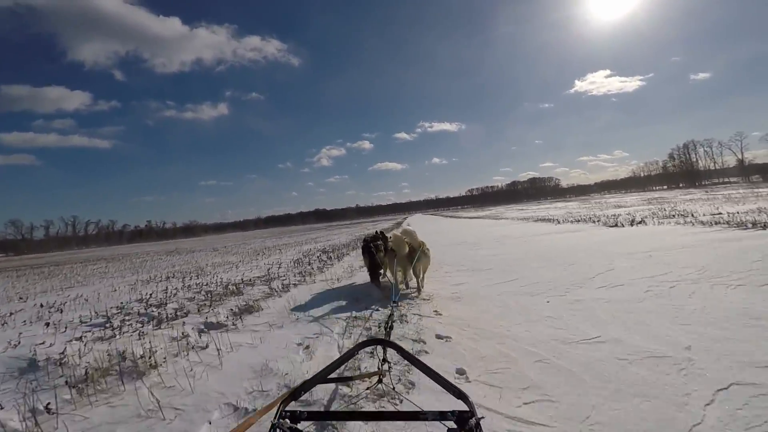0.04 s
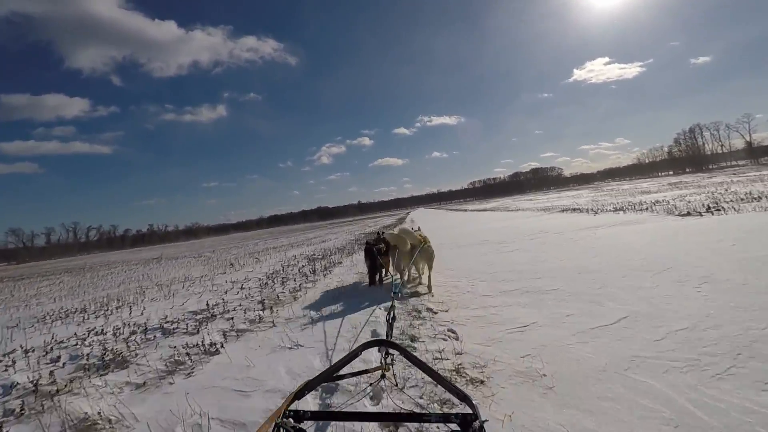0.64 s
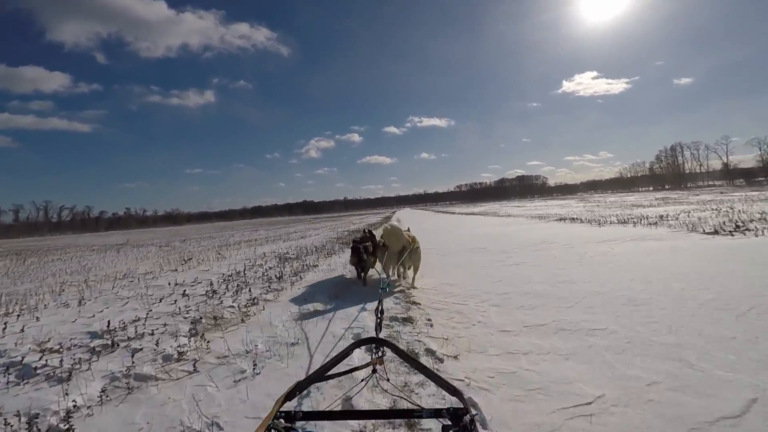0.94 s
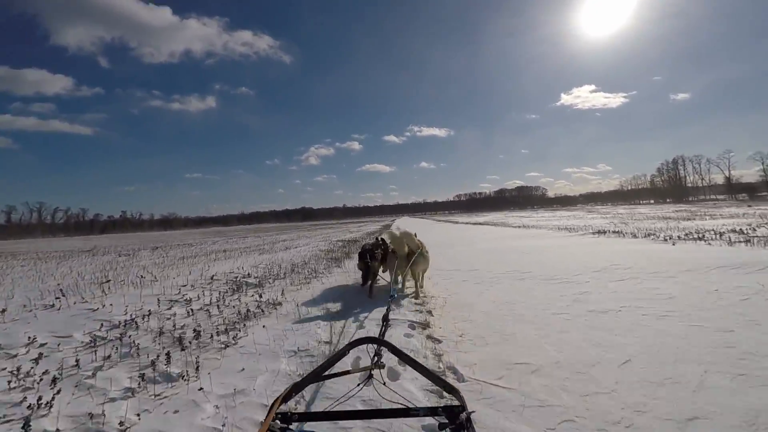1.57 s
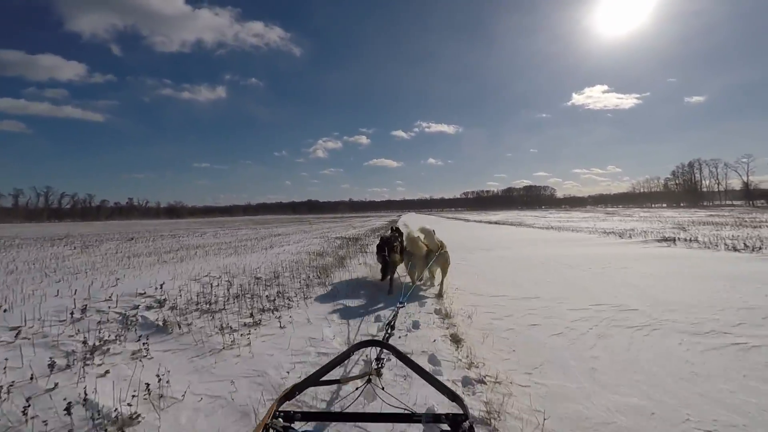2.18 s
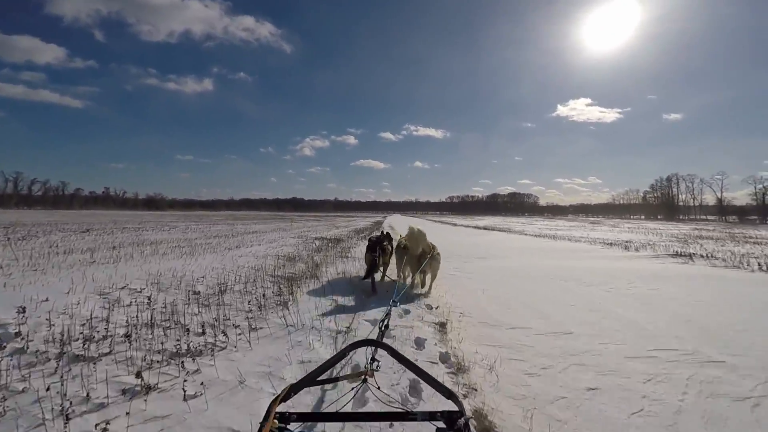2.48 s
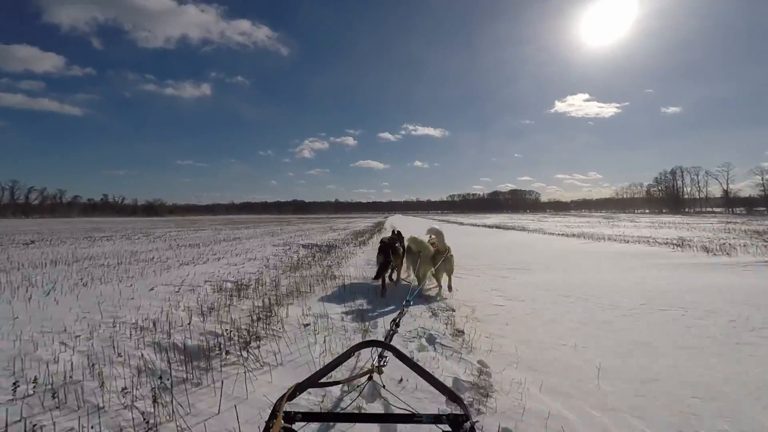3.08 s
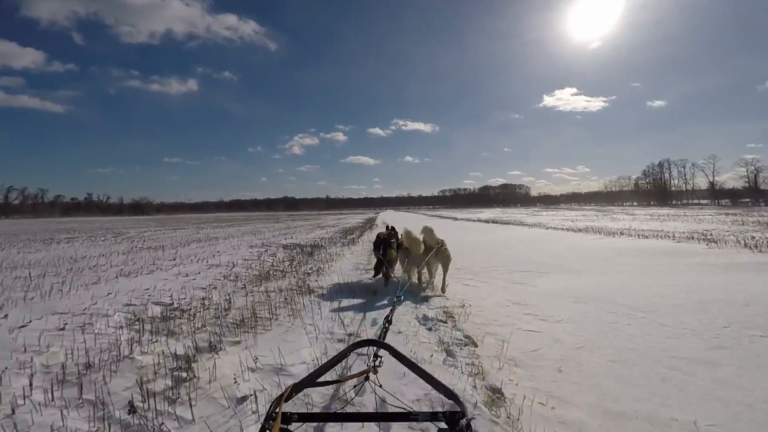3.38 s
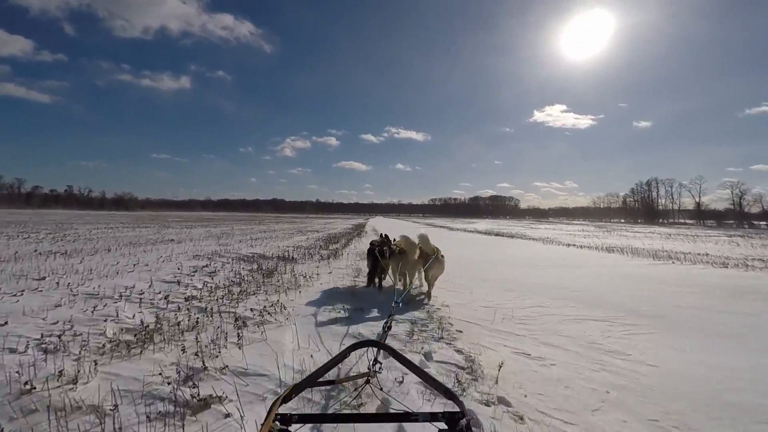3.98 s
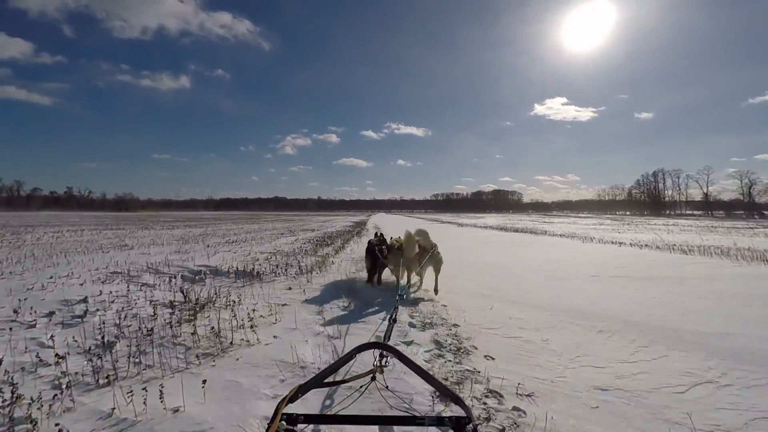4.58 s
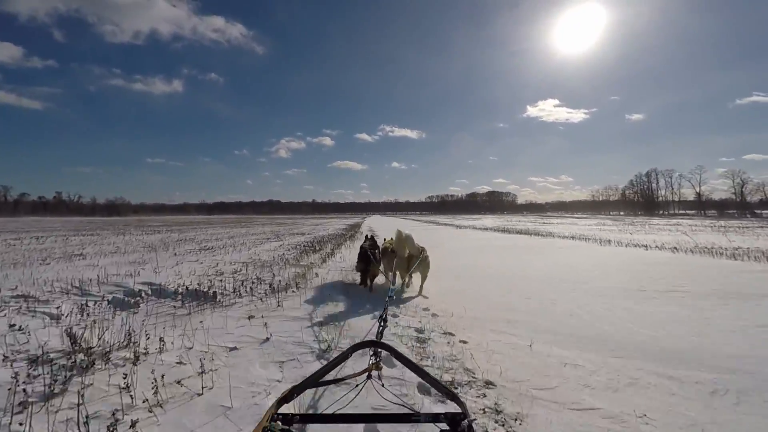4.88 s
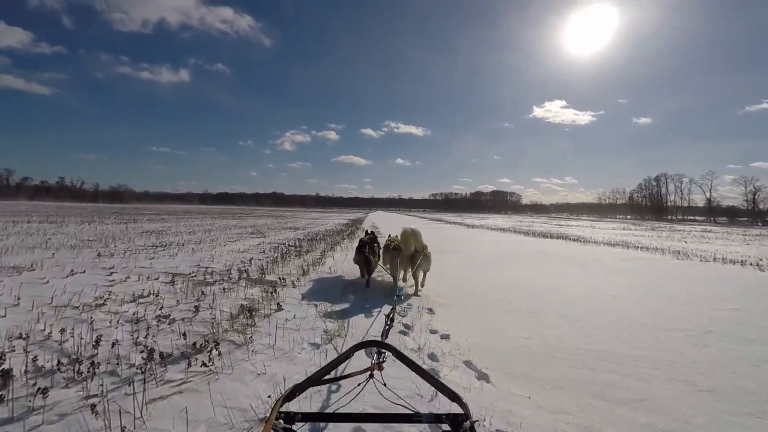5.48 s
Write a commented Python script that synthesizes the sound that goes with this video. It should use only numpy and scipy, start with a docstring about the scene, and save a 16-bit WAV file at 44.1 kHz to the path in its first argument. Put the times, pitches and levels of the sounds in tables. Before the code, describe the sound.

Wind buffets a microphone mounted on a dog sled throughout, a low, fluttering rumble with sudden slaps, in open air without echo. Beneath it the runners hiss and grind over crusty snow, with a faint hollow hum from the microphone's case. The runners squeak faintly during the first 0.7 seconds, and a slap and deep thud land at about 0.65. Sharp knocks and a short scrape cluster at 1.5 seconds, followed by a thud and a crack around 2. The wind eases from about 2.1 to 4 seconds while the snow hiss grows. The busiest clatter comes from 3.5 to 3.8 seconds: knocks, scrapes, dull thuds, bright tow line clinks and dry ice ticks. The wind surges back with another thud near 4.2 seconds and keeps gusting over lighter scattered knocks until the end at about 5.7.

```python
"""Wind eddies buffet and slap a cased camera fixed to a dog sled running over a snowy field.
Ridges thud; crust and stubble knock and scrape on the frame, ringing its modes and the case's.
The runners crush snow grains, which grind and hiss, and sing by stick-slip on hard snow.
The tow line's hardware clinks, thrown ice specks tick, and runners and wind keep the case humming."""
import sys
import numpy as np
from scipy import signal
from scipy.fft import rfft, irfft, next_fast_len
from scipy.io import wavfile
from scipy.ndimage import uniform_filter1d, map_coordinates

SR = 44100
rng = np.random.default_rng(int(sys.argv[2]) if len(sys.argv) > 2 else 0)


def log_audio(samples):
    """Write samples as a 16-bit WAV file to the path given in sys.argv[1]."""
    # one column per channel
    frames = np.atleast_2d(samples).T
    # limit to full scale, then quantise
    limited = np.clip(frames, -1, 1)
    pcm = np.round(limited * 32767).astype(np.int16)
    wavfile.write(sys.argv[1], SR, pcm)


N = 253134

# Wind over the case. Each row: time in seconds, strength in dB.
WIND_STRENGTH = [(0, -24.5), (.13, -23.5), (.47, -20), (.85, -21.5), (1.25, -19), (1.5, -25.5), (1.85, -23),
                 (2.07, -22), (2.14, -29), (2.6, -29.5), (2.95, -28), (3.06, -27.5), (3.28, -26.5),
                 (3.9, -27), (4.15, -20), (4.42, -24), (4.72, -23.5), (5.25, -21), (5.74, -24.5)]
# Lulls between eddies. Each row: start in seconds, length in seconds, depth in dB.
LULLS = [(0.348, 0.053, -6), (0.893, 0.04, -3.5), (1.38, 0.016, -0.5), (2.096, 0.13, -3.5),
         (2.345, 0.034, -0.5), (2.448, 0.067, -3), (2.612, 0.05, -2), (3.006, 0.077, -5.5),
         (3.154, 0.033, -7), (3.29, 0.025, -1), (3.4, 0.054, -5), (3.74, 0.055, -1), (3.87, 0.03, -1.5),
         (4.543, 0.081, -4), (4.842, 0.033, -4)]
# Big eddies on the case. Each row: start in seconds, length in seconds, relative level in dB.
BUFFETS = [(0.262, 0.02, -14), (0.42, 0.043, -16.5), (0.619, 0.032, -12.5), (0.938, 0.035, -17),
           (1.017, 0.053, -19), (1.173, 0.08, -19.5), (1.604, 0.021, -12), (1.693, 0.041, -26),
           (1.736, 0.13, -20.5), (1.968, 0.02, -12), (2.22, 0.055, -22.5), (2.293, 0.015, -25.5),
           (2.384, 0.029, -21), (2.676, 0.11, -19), (2.863, 0.026, -15), (2.92, 0.079, -15),
           (3.474, 0.029, -14), (3.542, 0.017, -16.5), (3.587, 0.028, -13.5), (3.831, 0.022, -17.5),
           (4.001, 0.012, -12), (4.043, 0.081, -16), (4.201, 0.044, -16.5), (4.277, 0.029, -16),
           (4.676, 0.098, -18), (4.403, 0.027, -17.5), (4.955, 0.05, -18), (5.225, 0.06, -18),
           (5.335, 0.038, -19), (5.502, 0.048, -22), (5.643, 0.085, -15.5)]
# Large eddies at unit pace. Each row: frequency in Hz, relative density in dB.
EDDY_SPECTRUM = [(8, -36.5), (16, -2), (35, 1), (50, 0.5), (70, -8.5), (100, -14), (200, -43.5),
                 (500, -87.5), (4000, -140)]
# Small eddies. Each row: frequency in Hz, relative density in dB.
TURBULENCE_SPECTRUM = [(35, -16.5), (75, 8), (105, 6.5), (150, 1.5), (250, -3.5), (420, -7.5), (620, -13),
                       (760, -26), (1100, -34), (1700, -46.5), (3000, -48), (7000, -77), (16000, -76)]


def wind(eddy_db, buffet_db, turbulence_db, wake_db, gust_db, flutter_db, coupling_db, body_hz):
    """Large eddies push on the case; small ones break off, most at pressure crests and in buffets."""
    strength, = gains(WIND_STRENGTH)
    over_breeze = strength / undb(-33)
    lulls_db = sum(depth_db * swell(s, length_s, edge_s=0.0106) for s, length_s, depth_db in LULLS)
    gustiness = strength.min() / strength  # strong wind blows more evenly
    gusts = undb(gust_db * walk(per_s=14) * gustiness + lulls_db)
    windows = np.array([swell(s, length_s, edge_s=0.0106) for s, length_s, _ in BUFFETS])
    buffets = undb(np.array(BUFFETS)[:, 2] + buffet_db) @ windows
    eddy_gain = np.hypot(undb(eddy_db) * over_breeze ** 0.11 * gusts, buffets)
    turbulence_gain = undb(turbulence_db + wake_db * windows.sum(axis=0)) * strength * gusts
    pace = 0.8 * over_breeze ** 0.3
    eddies = colour(rng.standard_normal(N), EDDY_SPECTRUM)
    eddies = steady(map_coordinates(eddies, [np.cumsum(pace)], order=1, mode="mirror"), span_s=0.039)
    bursts = undb(flutter_db * walk(per_s=80) + coupling_db * eddies)
    turbulence = steady(colour(rng.standard_normal(N) * bursts, TURBULENCE_SPECTRUM), span_s=0.038)
    body = signal.sosfiltfilt(signal.butter(2, body_hz, "highpass", fs=SR, output="sos"), turbulence)
    turbulence += body * (over_breeze ** 0.18 - 1)  # stronger wind sheds smaller eddies
    return eddy_gain * eddies + turbulence_gain * turbulence


# Wind slaps. Each row: start in seconds, relative peak in dB.
SLAPS = [(0.647, -1), (.681, -4.5), (0.707, -6), (.781, -9.5), (.817, -9), (0.973, -6), (1.472, -10),
         (1.684, -6), (1.965, -4.5), (2.247, -13), (2.423, -25), (2.939, -12), (2.971, -9.5), (3.253, -8.5),
         (3.837, -1), (4.07, -4), (4.174, -1.5), (4.229, -8.5), (4.686, -8.5), (5.228, -8.5), (5.426, -3.5)]


def slaps(gain_db, decay_s, highpass_hz):
    """A vortex hits the case: one sudden pressure swing, with turbulence that dies at once."""
    out, t = np.zeros(N), np.arange(SR // 10) / SR
    highpass = signal.butter(1, highpass_hz, "highpass", fs=SR)
    for s, peak_db in SLAPS:
        burst = 0.22 * rng.standard_normal(len(t)) * np.exp(-t / decay_s)
        burst[0] += rng.choice([-1, 1])
        swing = signal.lfilter(*highpass, colour(burst, TURBULENCE_SPECTRUM))
        add(out, s, swing, peak_db + gain_db)
    return out


# Drops over ridges. Each row: centre in seconds, relative peak in dB, corner frequency in Hz.
THUDS = [(0.652, -2, 55), (1.975, -4.5, 45), (3.258, -3, 35.8), (3.6, -3.5, 55), (3.8412, -8, 45),
         (4.181, -5.5, 95), (4.201, -4.5, 95)]


def thuds(gain_db, turn_s):
    """A ridge lifts the sled and drops it: one deep swing."""
    out, t = np.zeros(N), np.arange(-SR // 20, SR // 20) / SR
    for s, peak_db, corner_hz in THUDS:
        swing = -np.tanh(t / turn_s) * np.exp(-np.abs(2 * np.pi * corner_hz * t))
        add(out, s + t[0], swing, peak_db + gain_db)
    return out


# Frame and case modes. Each row: frequency in Hz, free t60 in seconds, relative level in dB.
CASE_MODES = [(564, 0.015, 25), (870, 0.016, 14), (1100, 0.041, -31), (1630, 0.0067, 13.5),
              (1640, 0.049, 6), (1846, 0.051, 0.5), (2140, 0.0062, 11), (2680, 0.035, 2.5),
              (2820, 0.083, 1), (3510, 0.049, -2), (4100, 0.0093, 8.5), (4690, 0.022, 8),
              (5410, 0.021, 1.5), (6300, 0.0061, 5.5)]


def case_ring(centre_hz, focus_db):
    """The modes answer one push; its place weights them about centre_hz and sets each sign."""
    t = np.arange(SR // 8) / SR
    hz, t60_s, mode_db = np.transpose(CASE_MODES)
    octaves_off = np.minimum(np.abs(np.log2(hz / centre_hz)), 1.5)
    weights = undb(mode_db - focus_db * octaves_off) * rng.choice([-1, 1], len(hz))
    detuned_hz = hz * (1 + 0.025 * rng.standard_normal(len(hz)))
    decays = np.exp(-np.log(1000) * t / t60_s[:, None])
    return weights @ (np.sin(2 * np.pi * np.outer(detuned_hz, t)) * decays)


# Blows on the frame. Each row: start in seconds, relative peak in dB, favoured pitch in Hz, crack gain.
KNOCKS = [(0.3233, -27.5, 1800, 3.9), (.648, -25, 1100, 15), (0.845, -27, 1370, 7.2),
          (1.123, -33, 1350, 9.1), (1.1734, -32, 1300, 12), (1.4112, -28, 1410, 5.1), (1.43, -31, 1500, 6),
          (1.518, -21, 1870, 3), (1.5246, -14, 1800, 7.2), (1.544, -20, 1860, 2), (1.5508, -13, 2530, 7.8),
          (1.564, -25, 2850, 3), (1.577, -29, 1800, 2), (1.8418, -23.5, 1230, 4.3),
          (1.9683, -22.5, 1720, 6), (2.0949, -15, 2500, 27), (2.097, -24.5, 900, 2.6),
          (2.259, -31, 3800, 18), (2.294, -37, 1900, 5), (2.339, -32, 1790, 7.4), (2.4867, -27, 2750, 6.1),
          (2.514, -32, 2800, 6), (2.579, -33, 2800, 12), (3.1246, -24.5, 3350, 3.5),
          (3.166, -23.5, 1690, 3.8), (3.406, -24, 2740, 8), (3.529, -19.5, 3200, 7.4),
          (3.5536, -10.5, 2700, 6.8), (3.563, -21, 1200, 9), (3.5793, -15, 1640, 3.8),
          (3.589, -22, 2600, 6.8), (3.609, -27, 2410, 9), (3.622, -21, 2820, 6.8), (3.633, -21, 1100, 11),
          (3.6519, -13, 4720, 3.2), (3.744, -19.5, 2090, 6.7), (3.806, -17, 1930, 3.3),
          (4.0334, -15, 1780, 14), (4.227, -18, 1400, 20), (4.2528, -26, 2300, 14),
          (4.2997, -25.5, 1840, 15), (4.633, -28.5, 1200, 15), (4.6944, -19.5, 1460, 33),
          (4.762, -27.5, 1860, 16), (4.907, -27, 1480, 23), (5.0796, -28, 1340, 12), (5.381, -30, 1040, 18),
          (5.429, -31, 1800, 23), (5.522, -29, 1580, 13), (5.539, -30, 1800, 1.5), (5.631, -33.5, 4000, 13)]


def knocks(gain_db, focus_db, grit, contact_s, wall_hz, damping_s):
    """Each blow cracks and rubs on the modes; contact damps them and the case wall muffles the top."""
    out, t = np.zeros(N), np.arange(SR // 8) / SR
    age = t / contact_s
    for s, peak_db, centre_hz, crack_gain in KNOCKS:
        push = grit * rng.standard_normal(len(t)) * np.sqrt(age) * np.exp(-age)
        push[0] += 1
        crack = np.sin(2 * np.pi * centre_hz * t) * np.exp(-2 * centre_hz * t)
        ring = case_ring(centre_hz, focus_db) * np.exp(-t / damping_s) + crack_gain * crack
        add(out, s, signal.fftconvolve(push, ring)[:len(t)], peak_db + gain_db)
    return signal.sosfilt(signal.butter(3, wall_hz, fs=SR, output="sos"), out)


# Drags through crust and stubble.
# Each row: start in seconds, length in seconds, relative peak in dB, relative case hum in dB.
SCRAPES = [(1.524, 0.031, -32, -17), (2.336, 0.034, -38.5, -35), (2.482, 0.037, -31, -25),
           (3.12, 0.032, -31.5, -24), (3.162, 0.038, -31, -25.5), (3.331, 0.033, -47, -19.5),
           (3.533, 0.043, -17.5, -29), (3.577, 0.085, -19.5, -22), (4.064, 0.04, -23, -23),
           (4.219, 0.019, -34, -30)]


def scrapes(gain_db, slips_per_s, rasp):
    """The dragging frame catches and slips; every slip rasps and rings the modes."""
    out, t = np.zeros(N), np.arange(SR // 4) / SR
    for s, length_s, peak_db, _ in SCRAPES:
        pressure = np.sqrt(np.maximum(np.sin(np.pi * np.minimum(t / length_s, 1)), 0))
        slips = (rng.random(len(t)) < slips_per_s / SR) * rng.standard_normal(len(t)) * pressure
        ring = signal.fftconvolve(slips, case_ring(centre_hz=2000, focus_db=1))[:len(t)]
        add(out, s, unit(ring) + rasp * unit(colour(slips, CRUST_SPECTRUM)), peak_db + gain_db)
    return out


# Runners on snow. Each row: time in seconds, relative grinding in dB, relative powder hiss in dB.
GLIDE = [(0, -43.5, -64), (.2, -45.5, -60), (.42, -44, -58.5), (.8, -45.5, -56.5), (1.25, -50, -52),
         (1.72, -47, -56), (2.15, -54.5, -63.5), (2.5, -46, -57.5), (2.9, -47, -54.5), (3.05, -44, -56),
         (3.25, -41.5, -52), (3.72, -39.5, -49), (4.16, -41.5, -51.5), (4.45, -45.5, -55.5),
         (4.79, -47, -58), (4.86, -48.5, -62), (5.2, -49, -62), (5.74, -46.5, -57.5)]
# Crushed crust. Each row: frequency in Hz, relative density in dB.
CRUST_SPECTRUM = [(400, -18), (800, -29), (1300, 0.5), (1600, 2.5), (1870, 4.5), (2000, -14), (2300, 0),
                  (2480, -10), (2780, 0), (3250, -11.5), (4100, -9.5), (4650, -14), (5000, -28),
                  (9000, -20.5)]
# Brushed powder. Each row: frequency in Hz, relative density in dB.
POWDER_SPECTRUM = [(700, 1.5), (1500, 9), (2000, 5.5), (2800, 10), (3400, 4.5), (4300, 10), (5000, 3.5),
                   (5500, 5.5), (6400, 3), (6900, -1.5), (9300, -0.5), (12500, -2.5), (15500, -3.5)]


def runners(grind_db, powder_db):
    """The runners crush crust in uneven patches and brush powder in short gritty surges."""
    grind, powder = gains(GLIDE)
    patches_db = walk(per_s=42)
    crushing = grains(per_s=5600, spread_db=1.5) * undb(0.92 * patches_db)
    crust = unit(colour(crushing, CRUST_SPECTRUM))
    surges = undb(0.9 * patches_db + 0.6 * walk(per_s=16))
    hiss = unit(colour(grains(per_s=17000, spread_db=2.1) * surges, POWDER_SPECTRUM))
    return undb(grind_db) * grind * crust + undb(powder_db) * powder * hiss


# Hard-packed stretches. Each row: start in seconds, length in seconds, relative level in dB.
HARD_SNOW = [(0.024, .26, -51), (0.275, 0.45, -46), (1.372, 0.054, -43.5), (3.58, 0.027, -35),
             (5.54, 0.059, -45)]
# Runner modes. Each row: frequency in Hz, width per filter stage in Hz, relative level in dB.
RUNNER_MODES = [(1677, 140, 5), (1830, 50, 0), (2290, 160, -18), (2830, 280, -1.5)]


def singing(gain_db, slips_per_s, uneven_db, drift):
    """On hard snow the runners stick, slip and ring; their pitch drifts as the load shifts."""
    slips = grains(slips_per_s, spread_db=2.5) * undb(uneven_db * walk(per_s=29))
    ring = sum(undb(db) * unit(resonate(slips, hz, width_hz)) for hz, width_hz, db in RUNNER_MODES)
    ring = map_coordinates(ring, [np.cumsum(1 + drift * walk(per_s=9))], mode="mirror")
    level = sum(undb(db + gain_db) * swell(s, length_s, edge_s=0.018) for s, length_s, db in HARD_SNOW)
    return level * unit(ring)


# Tow line hardware. Each row: start in seconds, relative peak in dB, pitch in Hz.
CLINKS = [(.876, -32, 4000), (1.154, -28, 4500), (1.174, -37, 4500), (1.2126, -39, 4940),
          (1.2965, -41, 3950), (1.3034, -36.5, 4000), (1.5506, -30, 4620), (1.5533, -33, 3370),
          (1.564, -30.5, 4600), (2.025, -40, 4400), (2.047, -36.5, 4400), (2.281, -39.5, 4150),
          (2.5325, -40, 4720), (3.328, -37, 4800), (3.521, -27, 4630), (3.542, -26, 4670),
          (3.6423, -21, 4500), (3.655, -19.5, 4530), (4.3154, -38.5, 4600), (4.442, -34.5, 4640),
          (4.6259, -37, 4440)]


def clinks(width_hz, chatter_s, rattle_per_s, rattle_db):
    """Metal links chatter and ring at a pitch that varies with the grip; between, they rattle faintly."""
    out, t = np.zeros(N), np.arange(SR // 16) / SR
    rattles = [(s, rattle_db + 2 * rng.standard_normal(), rng.uniform(3900, 4900))
               for s in chance_times(rattle_per_s)]
    for s, peak_db, hz in list(CLINKS) + rattles:
        touch = 0.38 * rng.standard_normal(len(t)) * np.exp(-t / chatter_s)
        touch[0] += 1
        ring = signal.lfilter(*signal.iirpeak(hz, hz / width_hz, fs=SR), touch)
        add(out, s, ring + 0.1 * colour(touch, CRUST_SPECTRUM), peak_db)
    return out


# Large ice specks. Each row: start in seconds, relative peak in dB.
ICE_SPECKS = [(0.617, -30.5), (.8759, -31), (0.967, -30.5), (1.524, -41), (1.745, -36), (2.49, -36),
              (2.755, -32), (3.1658, -23), (3.217, -25.5), (3.5524, -19), (3.61, -23.5), (3.8114, -22.5),
              (3.8607, -22.5), (4.2507, -29), (4.299, -29.5), (4.782, -28.5), (4.961, -35)]


def specks(gain_db, decay_s, fine_per_s, fine_db):
    """Ice specks shatter on the case with a dry, bright tick; fine ones fly up with the powder."""
    out, t = np.zeros(N), np.arange(SR // 40) / SR
    spectrum_hz_db = [(1500, -7), (4500, 9.5), (6800, 1.5), (9200, -1), (11000, -2.5), (15000, -16)]
    glide_s, _, powder_db = np.transpose(GLIDE)
    fine = [(s, np.interp(s, glide_s, powder_db) + fine_db) for s in chance_times(fine_per_s)]
    for s, peak_db in list(ICE_SPECKS) + fine:
        tick = rng.standard_normal(len(t)) * np.exp(-t / decay_s)
        add(out, s, colour(tick, spectrum_hz_db), peak_db + gain_db)
    return out


def hum(runner_db, wind_db, scrape_db, waver_db, ring_hz, width_hz):
    """Runners and wind keep the case's hollow lowest mode ringing; scrapes drive it harder."""
    ring = steady(resonate(rng.standard_normal(N), ring_hz, width_hz), span_s=0.072)
    grind, _ = gains(GLIDE)
    strength, = gains(WIND_STRENGTH)
    running = np.hypot(undb(runner_db) * (grind / grind.mean()) ** 0.8, undb(wind_db) * strength)
    running *= undb(waver_db * walk(per_s=12))
    dragging = sum(undb(hum_db + scrape_db) * swell(s, length_s, edge_s=0.018)
                   for s, length_s, _, hum_db in SCRAPES)
    return np.hypot(running, dragging) * ring


def clods(gain_db, per_s, centre_hz, crumble_s):
    """Snow clods tap the frame and crumble, harder where the runners grind more."""
    out, t = np.zeros(N), np.arange(SR // 16) / SR
    grind, _ = gains(GLIDE)
    for s in chance_times(per_s):
        push = rng.standard_normal(len(t)) * np.exp(-t / crumble_s)
        add(out, s, signal.fftconvolve(push, case_ring(centre_hz, focus_db=16))[:len(t)], gain_db)
    return grind * out


def crumbs(gain_db, per_s, places):
    """Crust crumbs patter on several places of the frame, harder where the runners grind more."""
    grind, _ = gains(GLIDE)
    patter = np.zeros(N)
    for _ in range(places):
        hits = grains(per_s / places, spread_db=0)
        patter += signal.fftconvolve(hits, case_ring(centre_hz=2000, focus_db=-2))[:N]
    return undb(gain_db) * grind * unit(patter)


def crackle(gain_db, per_s, spread_db):
    """Thin crust snaps under the runners in dry ticks, louder where more powder flies."""
    spectrum_hz_db = [(600, -31), (1500, 11), (2800, 7.5), (3500, 3), (4500, 7), (5400, -3),
                      (6400, -6.5), (7500, -14), (15000, -16)]
    _, powder = gains(GLIDE)
    snaps = np.tanh(grains(per_s, spread_db) / 3)
    return undb(gain_db) * powder * unit(colour(snaps, spectrum_hz_db))


def undb(db):
    """Decibels to gain."""
    return 10 ** (np.asarray(db) / 20)


def unit(x):
    """Scale to rms 1."""
    return x / np.sqrt(np.mean(x ** 2))


def gains(table):
    """A curve's dB columns as per-sample gains."""
    s, *columns = np.transpose(table)
    return [undb(np.interp(np.arange(N) / SR, s, db)) for db in columns]


def colour(x, spectrum_hz_db):
    """Minimum-phase filter with the given outline."""
    hz, db = np.transpose(spectrum_hz_db)
    size = 2 * next_fast_len(len(x))
    bins_hz = np.maximum(np.arange(size // 2 + 1) * SR / size, 1)
    cepstrum = irfft(np.log(undb(np.interp(np.log(bins_hz), np.log(hz), db))))
    cepstrum[1:size // 2] *= 2
    cepstrum[size // 2 + 1:] = 0
    return irfft(rfft(x, size) * np.exp(rfft(cepstrum)))[:len(x)]


def resonate(x, hz, width_hz):
    """Two equal resonators in series."""
    b, a = signal.iirpeak(hz, hz / width_hz, fs=SR)
    return signal.lfilter(b, a, signal.lfilter(b, a, x))


def walk(per_s):
    """Smooth random curve, rms 1."""
    step = int(SR / per_s)
    return unit(uniform_filter1d(np.repeat(rng.standard_normal(N // step + 1), step), step)[:N])


def steady(x, span_s):
    """Hold the rms near 1 over each span, keeping faster flutter."""
    size = int(span_s * SR)
    return x / np.sqrt(uniform_filter1d(uniform_filter1d(x ** 2, size), size) + 1e-12)


def swell(start_s, length_s, edge_s):
    """Trapezoid window, length_s wide at half height."""
    t = np.arange(N) / SR
    return np.clip(np.minimum(t - start_s, start_s + length_s - t) / edge_s + 0.5, 0, 1)


def grains(per_s, spread_db):
    """Tiny fractures: impulses of random time and size."""
    size = undb(spread_db * np.minimum(rng.exponential(size=N), 5))
    return (rng.random(N) < per_s / SR) * size * rng.standard_normal(N)


def chance_times(per_s):
    """Random moments in seconds."""
    return np.flatnonzero(rng.random(N) < per_s / SR) / SR


def add(track, start_s, sound, peak_db):
    """Mix in a sound at the given peak level."""
    i = max(int(start_s * SR), 0)
    track[i:i + len(sound)] += (sound * undb(peak_db) / np.abs(sound).max())[:N - i]


def scene():
    """Wind, gliding and small impacts in open air; mono, no echo."""
    air = wind(eddy_db=-17, buffet_db=5, turbulence_db=0.63, wake_db=2.5, gust_db=1.6,
               flutter_db=2.5, coupling_db=3, body_hz=236)
    air += slaps(gain_db=-5, decay_s=0.0079, highpass_hz=146)
    snow = runners(grind_db=-5.5, powder_db=6)
    snow += crumbs(gain_db=-8, per_s=42, places=5)
    snow += clods(gain_db=10.5, per_s=4, centre_hz=1400, crumble_s=0.0032)
    snow += singing(gain_db=-4, slips_per_s=1600, uneven_db=3.5, drift=0.012)
    snow += crackle(gain_db=-6, per_s=90, spread_db=-2)
    case = hum(runner_db=-43, wind_db=-25, scrape_db=-4.5, waver_db=4, ring_hz=589.6, width_hz=85)
    frame = knocks(gain_db=-1, focus_db=13, grit=0.22, contact_s=0.0029, wall_hz=6500, damping_s=0.0088)
    frame += scrapes(gain_db=2.5, slips_per_s=1100, rasp=0.49)
    frame += thuds(gain_db=-2.5, turn_s=0.0065)
    tow_line = clinks(width_hz=130, chatter_s=0.0024, rattle_per_s=12, rattle_db=-46)
    ice = specks(gain_db=-4.5, decay_s=0.0067, fine_per_s=10, fine_db=15.5)
    return (air + snow + case + frame + tow_line + ice)[None]


def record(dry):
    """The camera rounds the strongest pushes and cuts the top at 15.5 kHz."""
    rounded = dry / (1 + np.abs(dry / 0.95) ** 6) ** (1 / 6)
    return signal.sosfilt(signal.ellip(10, 0.1, 80, 15500, fs=SR, output="sos"), rounded)


dry = scene()
out = record(dry)
log_audio(out)
```